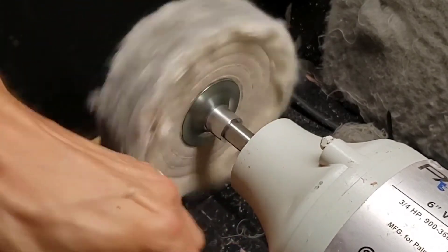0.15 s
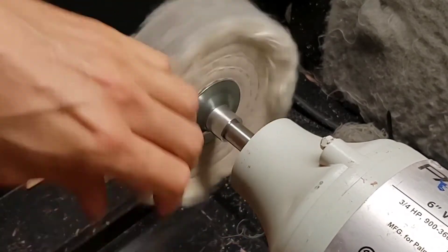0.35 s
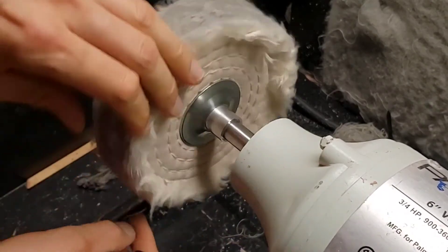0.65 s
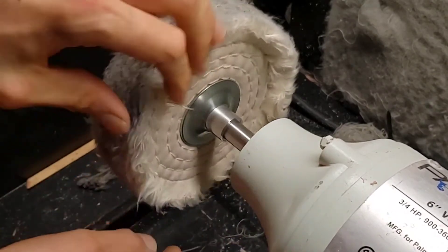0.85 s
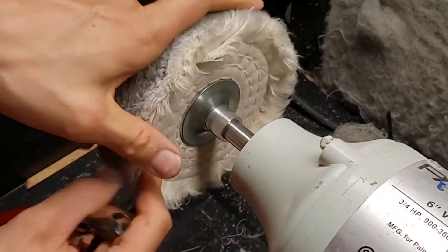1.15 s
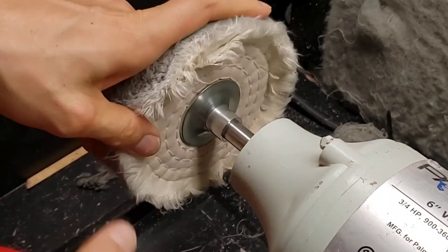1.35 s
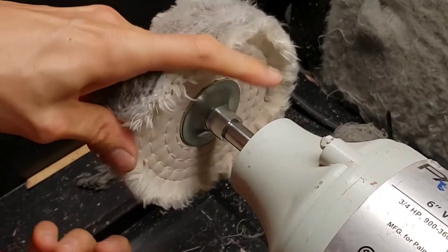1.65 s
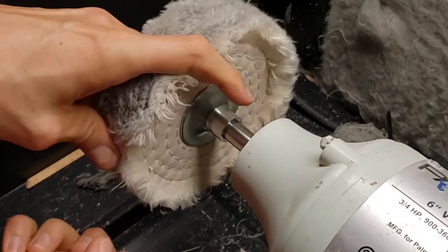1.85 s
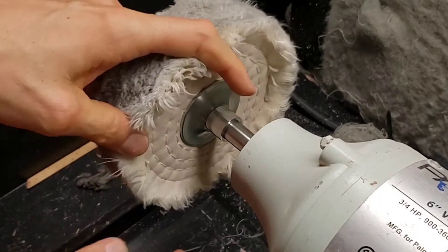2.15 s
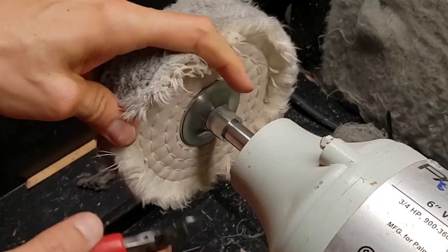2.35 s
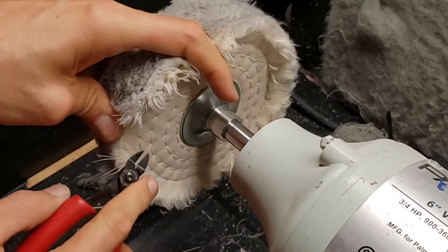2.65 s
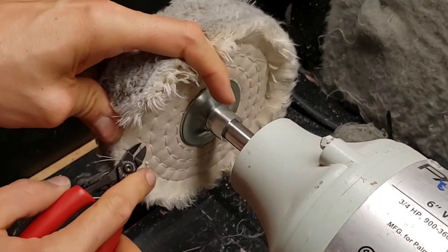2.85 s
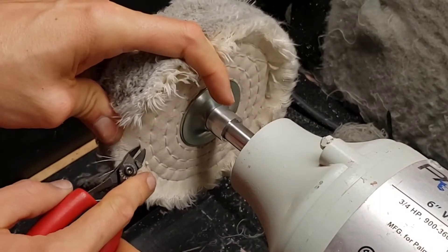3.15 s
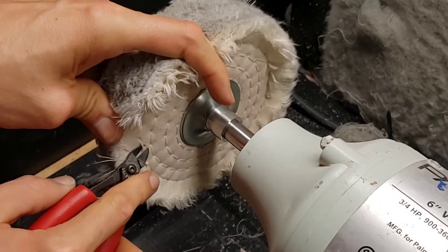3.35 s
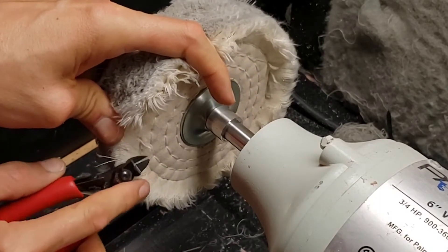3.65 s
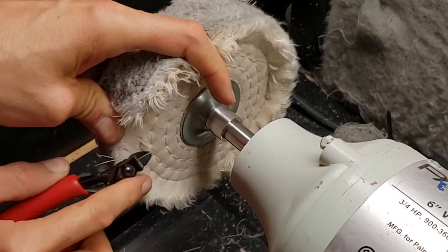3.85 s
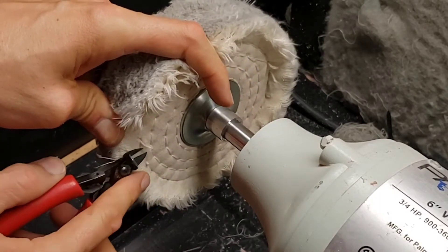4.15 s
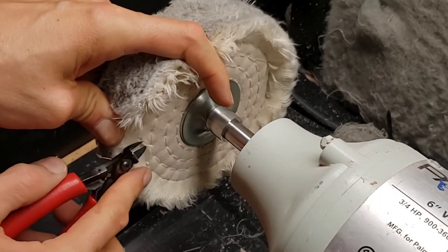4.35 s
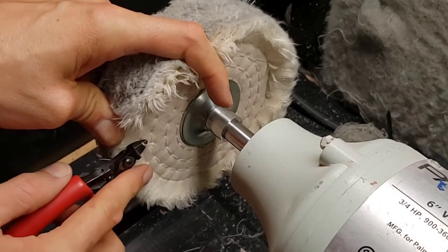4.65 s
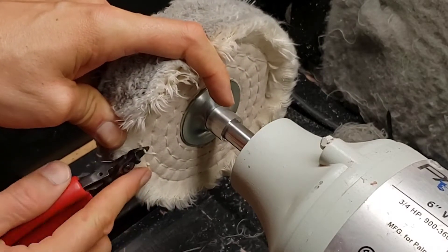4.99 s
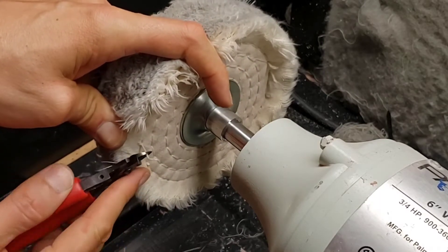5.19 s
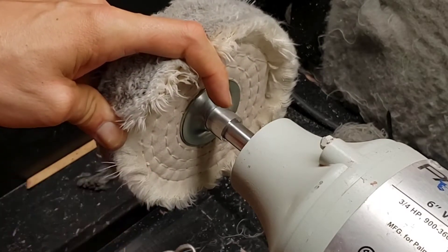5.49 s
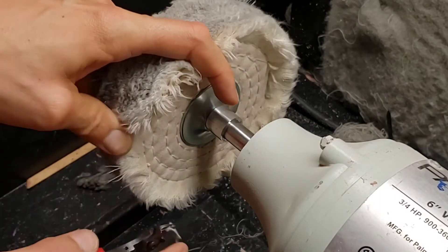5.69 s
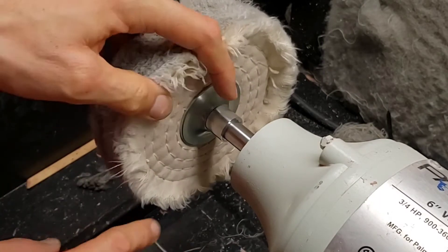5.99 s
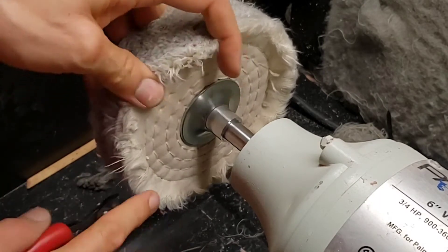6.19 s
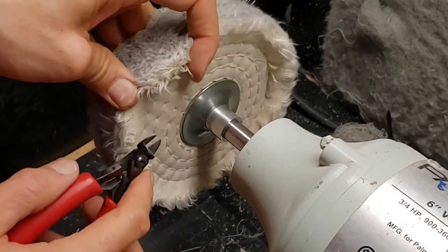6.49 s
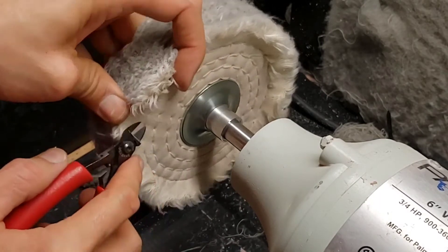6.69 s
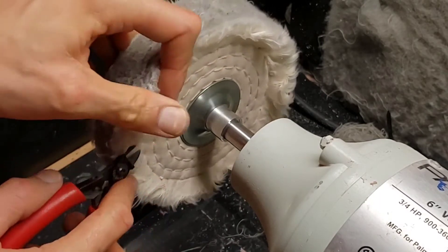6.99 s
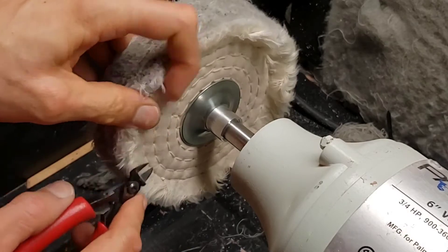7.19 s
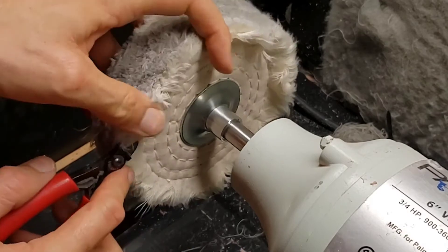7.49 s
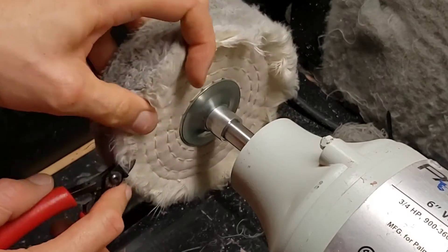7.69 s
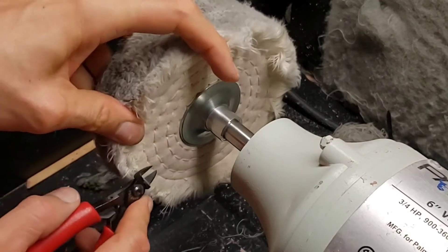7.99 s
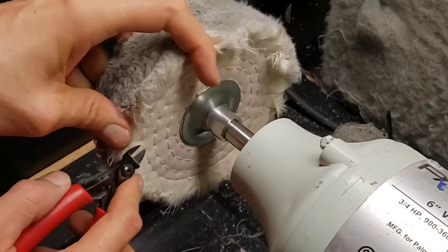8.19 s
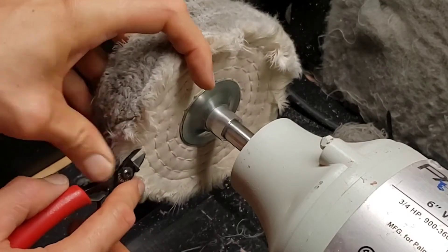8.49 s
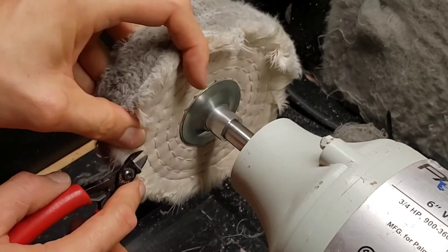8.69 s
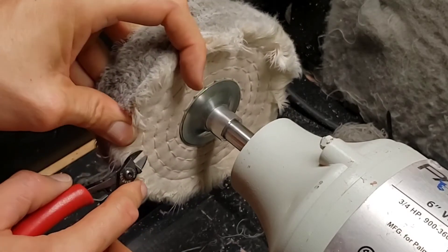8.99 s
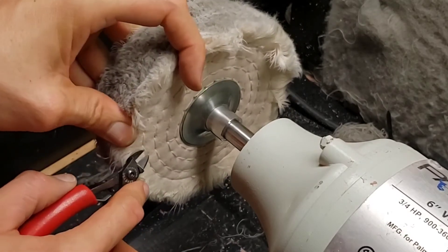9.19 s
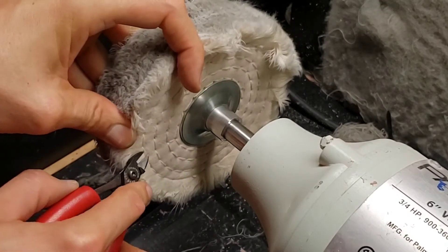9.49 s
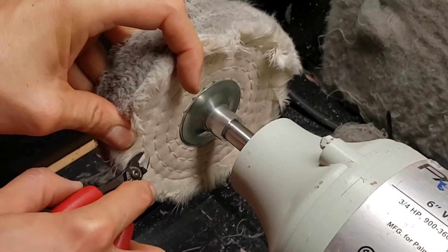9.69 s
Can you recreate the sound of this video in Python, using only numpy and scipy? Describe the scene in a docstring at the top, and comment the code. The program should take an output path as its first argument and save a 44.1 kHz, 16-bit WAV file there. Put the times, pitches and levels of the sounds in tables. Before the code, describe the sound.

Close stereo pickup of hand snips trimming a cloth buffing wheel in a small room. Quiet, continuous machine drone with deep fluttering rumble and faint airy whistle. After a light dull thump, a single hard steel snap about a second and a half in, with a tiny ring and short room tail, then a short fibre swish on the left. Soft low handling bumps follow later, and the machine continues alone.

```python
"""Side-cutting snips trim the stitching of a cloth buffing wheel in a small workshop.
A machine runs throughout: sine hum, and filtered noise for wavering rumble, drone, air and whistle.
Over it come a very faint cloth stroke (swelling hiss), soft bumps (low cosines) and a scrape of noise.
At 1.53 s the jaws snap shut once, a noise crack plus ringing sines, echoed by dying clouds of noise.
A brief swish of cloth follows, then one very faint stroke and, near 3.4 and 3.9 s, more soft bumps."""
import sys
import numpy as np
from scipy import signal
from scipy.fft import rfft, irfft
from scipy.io import wavfile
from scipy.ndimage import uniform_filter1d

SR = 44100
rng = np.random.default_rng(int(sys.argv[2]) if len(sys.argv) > 2 else 0)


def dump_mix(stems):
    """Bounce the given channels to the path in sys.argv[1] as a 16-bit WAV at rate SR."""
    frames = np.atleast_2d(stems).T  # one column per channel
    limited = np.clip(frames, -1, 1)  # hard clip at full scale
    pcm = np.round(limited * 32767).astype(np.int16)
    wavfile.write(sys.argv[1], SR, pcm)


N = 433944
TIME = np.arange(N) / SR
FREQS = np.maximum(np.fft.rfftfreq(N, 1 / SR), 1)

# mains hum of the machine, rms before panning: f/Hz, level/dB
HUM_TONES = [(119.98, -45.5), (239.96, -55.5)]
# low room resonances that the machine drives: f/Hz, nominal width/Hz, relative level/dB
RUMBLE_RESONANCES = [(27.8, 2, -23), (51, 7.2, -8), (65.8, 4.9, -4), (76.9, 7, -1), (88.3, 17, -9)]
# swelling and sinking of the rumble, before its overall trim: t/s, level/dB
RUMBLE_SWELLS = [(0.0, -41), (1.17, -43), (1.32, -39.5), (1.95, -47.5), (2.13, -42), (3.36, -47.2),
                 (4.68, -41), (5.85, -46.5), (6.09, -38), (6.51, -41), (6.75, -50.5), (6.96, -39.9),
                 (7.38, -39), (7.62, -47.5), (7.86, -39), (8.04, -47), (8.91, -40.5), (9.83, -45.5)]
# resonances of the machine's housing and air flow: f/Hz, nominal width/Hz, relative level/dB
DRONE_RESONANCES = [(114, 20, 2.5), (141.8, 32, 1), (178, 45, -4.5), (207.8, 29.5, 1.5), (351, 40, -7.5),
                    (385.5, 62, -5), (565, 84, -18), (664, 67, -11.5), (764, 25, -17)]
# colour of the broad rush of air: f/Hz, relative level/dB per Hz
AIR_COLOUR = [(20, -3.5), (260, 2), (450, -3.5), (850, -6), (1050, -5), (1450, -9.5), (1900, -11),
              (2400, -14), (3400, -15.5), (4400, -21.5), (6600, -20.5), (8500, -29.5), (12000, -26),
              (15800, -29)]
# narrow whistling bands in the air flow: f/Hz, nominal width/Hz, relative level/dB
WHISTLE_RESONANCES = [(1027, 30, 4), (1620, 42, -4.5), (1780, 32, -3.5), (2020, 64, -2.5),
                      (2820, 100, -10.5), (3440, 74, -18), (6370, 240, -12)]
# how alike the background is at the two microphones: f/Hz, likeness (1 same, 0 unrelated, -1 opposed)
STEREO_LIKENESS = [(140, .99), (210, 0.97), (330, 0.95), (500, 0.77), (770, 0.088), (1170, -0.43),
                   (1790, 0.02), (15000, -0.052)]
# left-right balance of the background: f/Hz, left over right/dB
STEREO_BALANCE = [(100, -3.5), (160, 0), (270, -0.5), (1220, -0.7), (2010, -3), (3330, -3), (6500, -3),
                  (9080, -1), (13000, 3.5)]
# strokes over the cloth, close by on the left: t/s, level/dB, length/s
CLOTH_STROKES = [(.46, -66, 0.14), (1.677, -42, 0.027), (1.98, -69, .08)]
# colour of the cloth's hiss: f/Hz, relative level/dB per Hz
CLOTH_COLOUR = [(900, -28), (1700, -11), (2400, -0.5), (4000, -9), (6500, -8.5), (10000, -8), (12000, 1),
                (15500, 0.5), (17000, -10)]
# soft bumps from handling the wheel: t/s, level/dB before panning, f/Hz, length/s
WHEEL_BUMPS = [(1.005, -38.5, 209, 0.0094), (1.066, -25.5, 69.6, 0.015), (3.444, -35.5, 185, 0.0078),
               (3.83, -41, 195, 0.0095), (3.862, -36.5, 176, 0.011), (3.917, -38, 196, 0.0084)]
# jaw contacts, first the thread parts, then the edges meet: t/s, level/dB
JAW_CONTACTS = [(1.5254, -7), (1.526, -0.5)]
# ringing of the snips: f/Hz, level/dB relative to the contact, t60/s, left over right/dB
SNIP_RINGING = [(516, -27.5, 0.1, 3), (816, -35, 0.072, -15), (1400, -30, 0.023, -10),
                (1704, -27.5, 0.024, -8), (2100, -29.5, .018, -1), (2440, -20.5, 0.015, 0),
                (2830, -20, 0.018, -1), (3300, -19, 0.014, -8), (3770, -20.5, 0.015, -13.5),
                (4590, -23.5, 0.011, 6.5), (6300, -31, .008, 8), (7800, -23.5, 0.0065, 10),
                (14300, -24, .007, 11)]
# colour of the crack of steel on steel: f/Hz, relative level/dB per Hz
CRACK_COLOUR = [(150, -22), (500, -19), (1000, -4), (3000, 9), (4600, -7), (6500, -8.5), (10500, -16),
                (14500, 1), (17000, -10)]
# colour of the snip scattered by nearby surfaces and the room: f/Hz, relative level/dB per Hz
SCATTER_COLOUR = [(150, 6.5), (480, 0.5), (700, -8), (1000, 1), (1600, -1), (2300, 0.5), (3100, 2.5),
                  (3800, -2.5), (4600, -10), (7500, -11), (10500, -15.5), (14500, -13), (17000, -19)]


def from_db(db):
    """Decibels to gain."""
    return 10 ** (np.asarray(db) / 20)


def rms_one(x):
    """Scale to unit rms, over both channels together."""
    return x / np.sqrt(np.mean(x ** 2) + 1e-20)


def in_time(rows):
    """A control curve at every sample."""
    return np.interp(TIME, *np.transpose(rows))


def over_hz(points):
    """A table joined by straight lines on a log-frequency axis."""
    hz, values = np.transpose(points)
    return np.interp(np.log(FREQS), np.log(hz), values)


def pan(left_db):
    """Left and right gains for a level difference."""
    return from_db(np.array([[.5], [-.5]]) * left_db)


def swell(s, length_s):
    """A smooth bell-shaped rise and fall around a moment."""
    return np.exp(-.5 * ((TIME - s) / length_s) ** 2)


def dying(age, t60):
    """Silent before age 0, then 60 dB down every t60, to a floor of -300 dB."""
    return (age >= 0) * from_db(-60 * np.clip(age / t60, 0, 5))


def hiss(spectrum):
    """Coloured noise, unrelated in the two channels; rms 1."""
    white = rfft(rng.standard_normal((2, N)))
    return rms_one(irfft(white * from_db(over_hz(spectrum)), N))


def resonances(modes):
    """Gain per frequency of steep-sided resonances that add in power."""
    power = 0
    for hz, width, db in modes:
        peak = from_db(db) / (1 + ((FREQS - hz) / (0.61 * width)) ** 2)
        power = power + peak ** 2
    return np.sqrt(power)


def rippled(depth):
    """Gain per frequency of a direct path plus a dozen wall echoes, different at each microphone."""
    delays_s = rng.uniform(0.00202, .025, (12, 2, 1))
    coarse = FREQS[::16]
    echoes = np.exp(-2j * np.pi * coarse * delays_s).sum(axis=0)
    gains = np.abs(1 + depth * echoes)
    return np.array([np.interp(FREQS, coarse, gain) for gain in gains])


def diffuse(gain):
    """Room-filling noise: alike in the bass, partly opposed near 1.2 kHz, unrelated in the treble; rms 1."""
    mid, side = rfft(rng.standard_normal((2, N)))
    alike = np.clip(over_hz(STEREO_LIKENESS), -1, 1)
    pair = np.sqrt(1 + alike) * mid + np.sqrt(1 - alike) * side * [[1], [-1]]
    return rms_one(irfft(pair * gain * pan(over_hz(STEREO_BALANCE)), N))


def machine_hum(pan_db):
    """Mains hum as steady sines, each starting at a random phase."""
    hum = 0
    for hz, db in HUM_TONES:
        cycles = hz * TIME + rng.random()
        hum = hum + from_db(db) * np.sqrt(2) * np.sin(2 * np.pi * cycles)
    return hum * pan(pan_db)


def machine_rumble(trim_db, steady_s):
    """Room resonances flutter freely over times below steady_s; slower, the level follows its curve."""
    rumble = diffuse(resonances(RUMBLE_RESONANCES))
    power = np.mean(rumble ** 2, axis=0)
    rumble /= np.sqrt(uniform_filter1d(power, size=int(steady_s * SR)))
    return rumble * from_db(in_time(RUMBLE_SWELLS) + trim_db)


def machine(rumble_db, drone_db, air_db, whistle_db, hum_pan_db):
    """Mains hum over low rumble, a hollow drone, rushing air and narrow whistling bands."""
    hum = machine_hum(hum_pan_db)
    rumble = machine_rumble(rumble_db, steady_s=.2)
    drone = from_db(drone_db) * diffuse(resonances(DRONE_RESONANCES))
    air = from_db(air_db) * diffuse(from_db(over_hz(AIR_COLOUR)) * rippled(depth=0.095))
    whistle = from_db(whistle_db) * diffuse(resonances(WHISTLE_RESONANCES))
    return hum + rumble + drone + air + whistle


def cloth(left_db):
    """With each stroke, fibres slide past one another in a smooth, very bright swish."""
    sliding = sum(from_db(db) * swell(s, length) for s, db, length in CLOTH_STROKES)
    # the left keeps its full level, the right drops
    return sliding * hiss(CLOTH_COLOUR) * from_db([[0], [-left_db]])


def bumps(left_db):
    """The padded wheel takes a push softly: a few low cycles swell and fade."""
    pushes = 0
    for s, db, hz, length in WHEEL_BUMPS:
        tone = np.cos(2 * np.pi * hz * (TIME - s))
        pushes = pushes + from_db(db) * swell(s, length) * tone
    return pan(left_db) * pushes


def bite(s, length_s, level_db):
    """Just before they shut, the edges scrape faintly into the thread."""
    return from_db(level_db) * hiss(SCATTER_COLOUR) * swell(s, length_s)


def snip(crack_db, crack_t60, crack_pan_db, right_lag_s):
    """Each contact gives a short crack and sets the jaws and handles ringing."""
    out = np.zeros((2, N))
    crack_noise = hiss(CRACK_COLOUR) * pan(crack_pan_db)
    for s, strength_db in JAW_CONTACTS:
        start = int(s * SR)
        span = slice(start, start + SR // 5)
        age = TIME[span] - s - np.array([[0], [right_lag_s]])
        ring = 0
        for k, (hz, db, t60, left_db) in enumerate(SNIP_RINGING):
            sign = (-1) ** k  # neighbouring modes start in opposite directions
            tone = np.sin(2 * np.pi * hz * age) * dying(age, t60)
            ring = ring + sign * from_db(db) * pan(left_db) * tone
        crack = from_db(crack_db) * crack_noise[:, span] * dying(age, crack_t60)
        out[:, span] += from_db(strength_db) * (ring + crack)
    return out


def scatter(start_s, t60, level_db, left_db, bright_left_db):
    """A dense, dying cloud of echoes; the treble reaches the left microphone more freely."""
    lean = pan(over_hz([(4000, left_db), (14000, bright_left_db)]))
    echoes = irfft(rfft(hiss(SCATTER_COLOUR)) * lean, N)
    return from_db(level_db) * echoes * dying(TIME - start_s, t60)


def scene():
    """Over the machine, the snip echoes off the wheel and motor close by, then round the workshop."""
    background = machine(rumble_db=0.36, drone_db=-46.5, air_db=-54, whistle_db=-70.5, hum_pan_db=-3.5)
    handling = cloth(left_db=28) + bumps(left_db=-1.5)
    scrape = bite(s=1.462, length_s=0.0071, level_db=-56.5)
    click = snip(crack_db=-21.5, crack_t60=0.018, crack_pan_db=4.5, right_lag_s=.00009)
    bench = scatter(start_s=1.527, t60=.042, level_db=-24.5, left_db=-4, bright_left_db=6)
    room = scatter(start_s=1.534, t60=0.15, level_db=-33.5, left_db=-5.5, bright_left_db=6)
    return background + handling + scrape + click + bench + room


def record(dry):
    """A steep elliptic low-pass cuts the top above 15850 Hz."""
    low_pass = signal.ellip(12, .1, 80, 15850, fs=SR, output="sos")
    return signal.sosfilt(low_pass, dry)


dry = scene()
out = record(dry)
dump_mix(out)
```